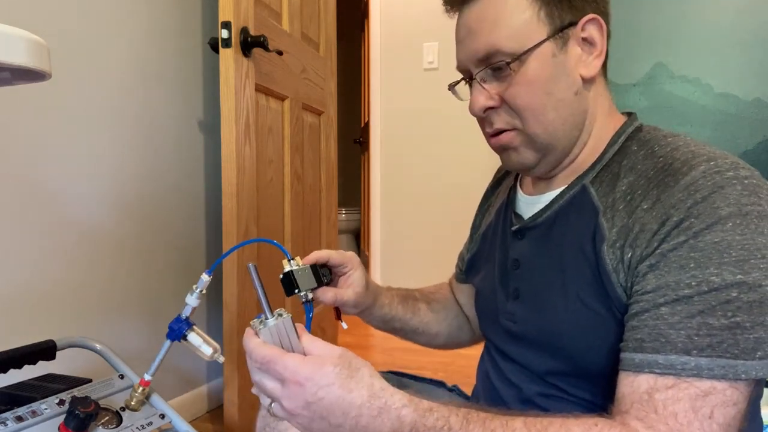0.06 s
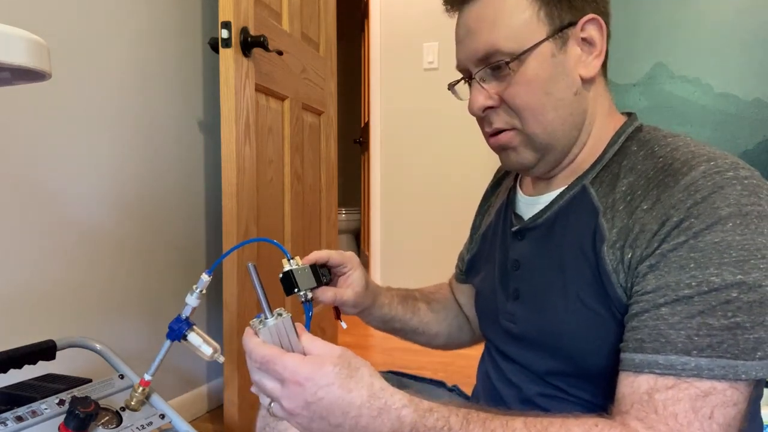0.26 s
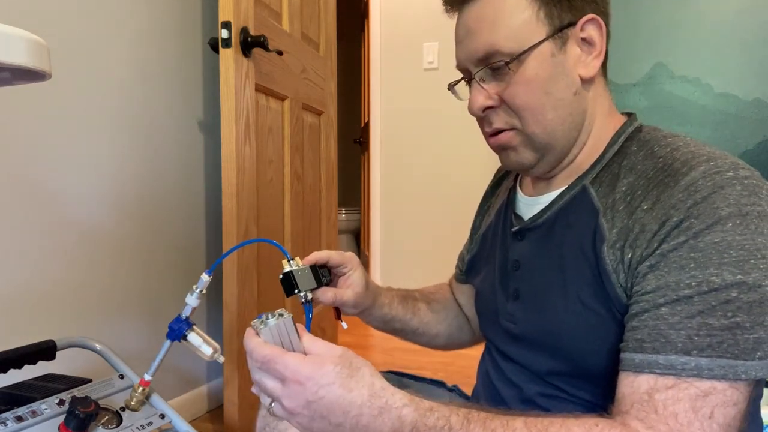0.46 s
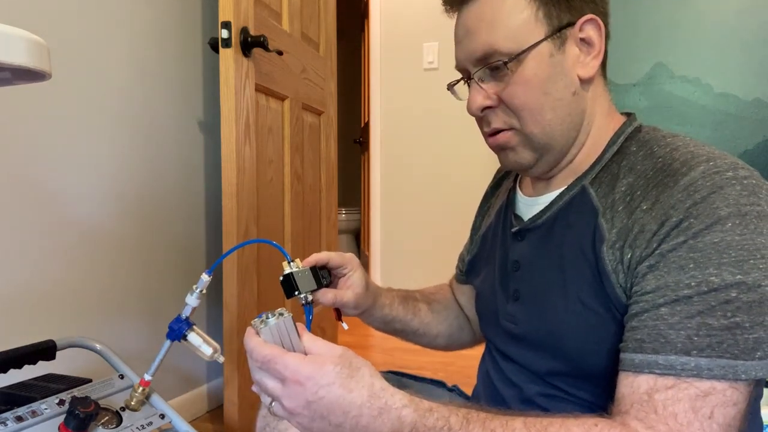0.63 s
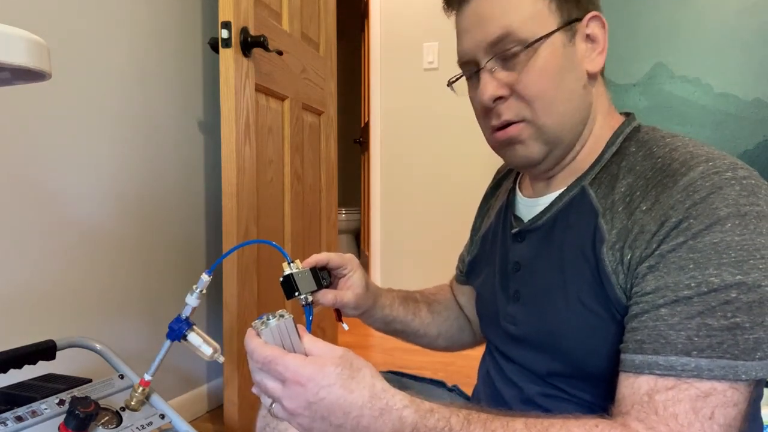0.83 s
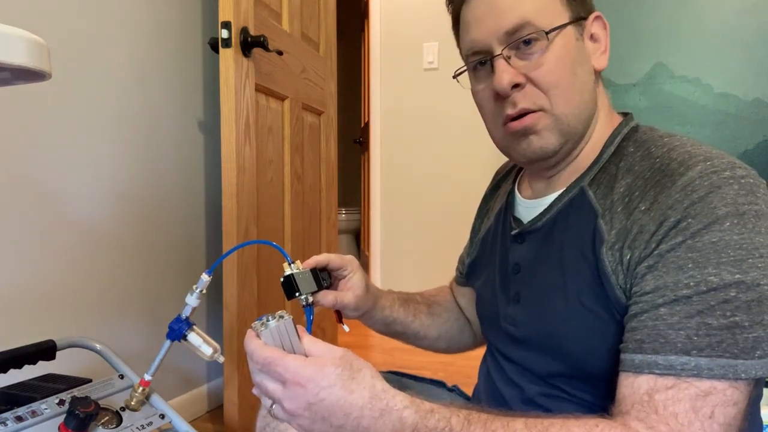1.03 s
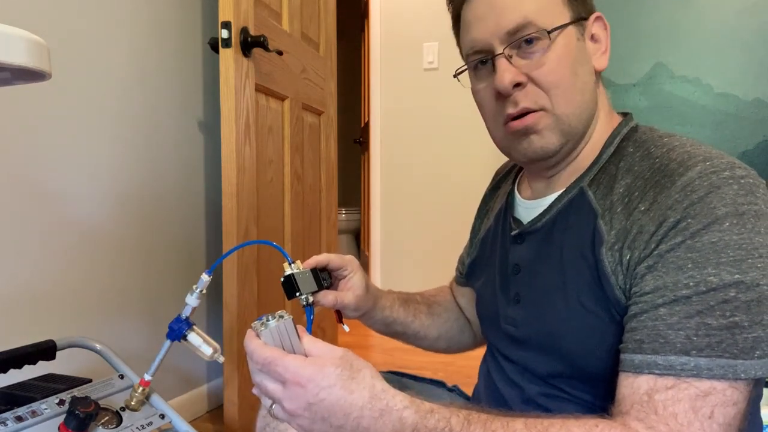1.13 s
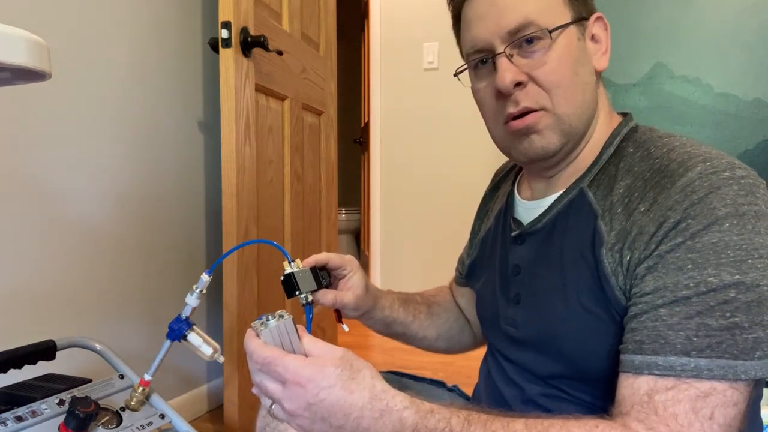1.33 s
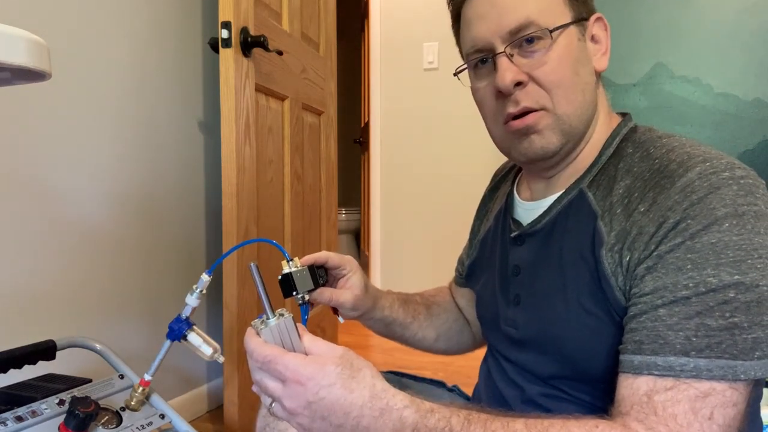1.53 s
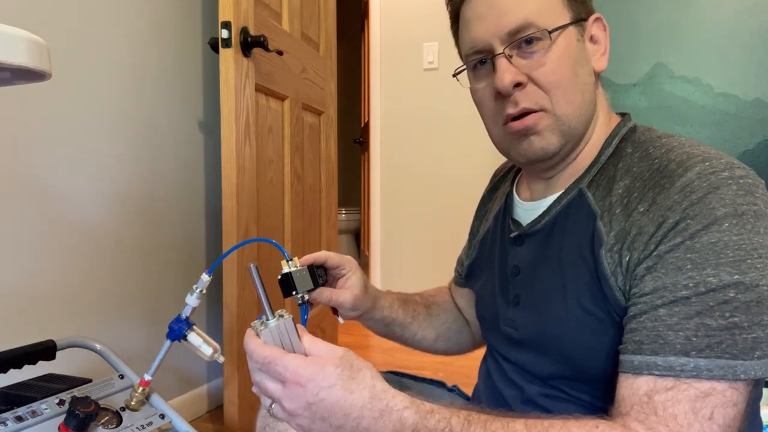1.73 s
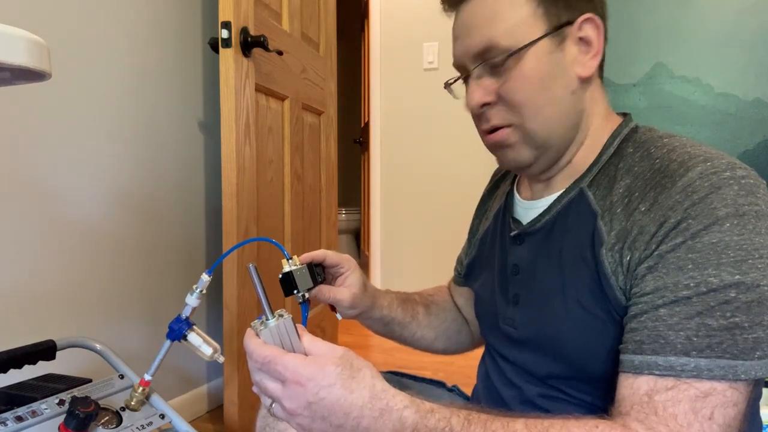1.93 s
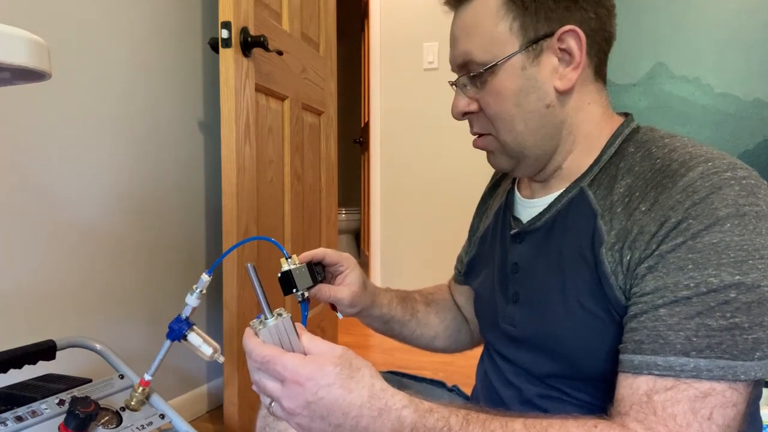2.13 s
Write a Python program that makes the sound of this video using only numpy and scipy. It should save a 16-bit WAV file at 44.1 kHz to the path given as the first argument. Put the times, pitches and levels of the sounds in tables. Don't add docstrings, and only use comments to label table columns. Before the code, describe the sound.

Two loud pneumatic bangs about a second apart, each a hiss, pop and clack in a small room

```python
import sys
import numpy as np
from scipy import signal
from scipy.fft import rfft, irfft
from scipy.io import wavfile
from scipy.ndimage import uniform_filter1d

SR = 44100
rng = np.random.default_rng(int(sys.argv[2]) if len(sys.argv) > 2 else 0)


def materialize(psi):
    bounded = np.clip(np.atleast_2d(psi).T, -1, 1)
    quanta = np.round(bounded * 32767).astype(np.int16)
    wavfile.write(sys.argv[1], SR, quanta)


def gain_from_decibels(decibels):
    exponent = np.asarray(decibels, float) / 20
    return 10 ** exponent


N = 95476

# hiss start in seconds, pop in seconds, end stop in seconds,
# pop level in dB, hiss level in dB.
STROKES = [
    (0.389, 0.3906, .4905, -4, -17.5),
    (1.436, 1.448, 1.5162, -4.5, -13),
]
# frequency in Hz, level in dB, T60 in seconds.
HOSE = [(237.66, -6.5, 0.045), (330, -13, 0.019), (476, -4.5, 0.022), (662, -2.5, 0.044),
        (875, -12.5, 0.026), (1120, -3.5, 0.018), (1347, -7.5, 0.0084), (1773, -5, 0.013),
        (2600, -6.5, 0.014), (4253, -8.5, 0.06), (8910, -11.5, .015)]


def shape(x, table):
    hz, db = np.array(table, float).T
    f = np.fft.rfftfreq(x.shape[-1], 1 / SR)
    gain_db = np.interp(np.log(f + 1), np.log(hz), db, left=db[0] - 15)
    y = irfft(rfft(x) * gain_from_decibels(gain_db), x.shape[-1])
    return y / y.std()


def band(x, hz, width):
    return signal.lfilter(*signal.iirpeak(hz, hz / width, fs=SR), x)


def low(x, hz, order=1):
    return signal.sosfiltfilt(signal.butter(order, hz, fs=SR, output="sos"), x)


def walk(rate):
    size = int(SR / rate)
    w = uniform_filter1d(rng.standard_normal(N), size, mode="wrap")
    w = uniform_filter1d(w, size, mode="wrap")
    return (w - w.mean()) / w.std()


def pair(n, alike_hz):
    mid, side = rng.standard_normal((2, n))
    side = side - low(side, alike_hz)
    return np.array([mid + side, mid - side])


def strike(at, modes, crack_db, crack_s, rise_s=0):
    # frequency in Hz, level in dB per Hz.
    crack_colour = [(400, -7.5), (1100, 1.5), (2500, -4.5), (5000, -10.5), (15000, -8.5)]
    t = np.arange(N) / SR - at
    u = np.maximum(t, 0)
    ring = 0
    for hz, db, t60 in modes:
        t60 = np.clip(t60, 0.003, 36 / hz + 0.0065)
        ring = ring + gain_from_decibels(db) * np.sin(2 * np.pi * hz * u) * np.exp(-np.log(1000) * u / t60)
    crack = gain_from_decibels(crack_db) * shape(rng.standard_normal(N), crack_colour) * np.exp(-u / crack_s)
    return (t >= 0) * (ring + crack) * np.minimum(u / (rise_s + 1e-4), 1)


def earlier():
    # frequency in Hz, level in dB per Hz.
    old_hiss = [(1500, -14), (2600, -11.5), (3700, -1), (6000, -9), (9400, -3), (13300, -2), (15500, -5)]
    t = np.arange(N) / SR
    ring_hz = 3830
    ring = band(band(pair(N, 500), ring_hz, 1500), ring_hz, 1500)
    hiss_part = shape(pair(N, 500), old_hiss) * gain_from_decibels(-36.5 - 60 * t / 0.1)
    return hiss_part + ring / ring.std() * gain_from_decibels(-51.5 - 60 * t / 0.19)


def hum():
    # frequency in Hz, level in dB per Hz.
    hum_colour = [(30, -22.5), (62, 1.5), (150, -13.5), (580, -22), (2500, -35.5), (6000, -39), (8500, -37),
                  (15500, -42.5)]
    bed = shape(pair(N, 900), hum_colour)
    bass = low(bed, 220, order=2)
    bed = bed - bass + bass * gain_from_decibels(3 * walk(12))
    mains = band(rng.standard_normal(N), 58, 12)
    duct = band(rng.standard_normal(N), 394, 70)
    return gain_from_decibels(-57) * bed + gain_from_decibels(-62) * mains / mains.std() + gain_from_decibels(-68.5) * duct / duct.std()


def onset_swell():
    # frequency in Hz, level in dB per Hz.
    swell_colour = [(300, -1), (2000, 0), (5000, -2), (8500, -8)]
    lead_s, growth_s = 0.022, 0.006
    t = np.arange(N) / SR
    noise = low(shape(pair(N, 800), swell_colour), 8500, order=8)
    swell = 0
    for start, *_ in STROKES:
        rise = np.exp((t - start).clip(max=0) / growth_s)
        swell = swell + rise * (t > start - lead_s) * (t < start)
    return gain_from_decibels(-25.5) * noise * swell


def hiss():
    # frequency in Hz, level in dB per Hz.
    jet_colour = [(200, -12), (900, -11), (2500, -11), (4700, -12.5), (6200, -8), (9000, -10.5),
                  (12000, -12.5), (15500, -9.5)]
    # frequency in Hz, width in Hz, level in dB.
    nozzle = [(592.6, 90, -7.5), (3337, 130, -19), (4460, 1200, -8), (4800, 170, -6.5), (7500, 2700, -8.5)]
    attack_s, release_s = 0.0029, 0.006
    t = np.arange(N) / SR
    white = rng.standard_normal(N)
    jet = shape(white, jet_colour)
    for hz, width, db in nozzle:
        jet = jet + gain_from_decibels(db) * 3 * band(white, hz, width)
    flow = 0
    for start, pop, stop, _, db in STROKES:
        level_db = np.interp(t, [pop - 0.012, pop - 0.001, pop, stop], [0, -11.5, 0, -6])
        gate = np.clip((t - start) / attack_s, 0, 1) * np.exp(-np.maximum(t - stop, 0) / release_s)
        flow = flow + gain_from_decibels(db + level_db) * gate
    return jet * flow * gain_from_decibels(1.2 * walk(150))


def pops():
    # frequency in Hz, level in dB, T60 in seconds.
    boom_modes = [(63.7, -10.5, 0.17), (83.3, -7, 0.15), (255, -11.5, 0.2)]
    t = np.arange(N) / SR
    total = 0
    for _, pop, _, db, _ in STROKES:
        boom = strike(pop, boom_modes, -67, 0.77, rise_s=0.021) * (t < pop + 0.5)
        total = total + gain_from_decibels(db) * (strike(pop, HOSE, -5.5, 0.0062) + boom)
    return total


def clacks():
    # time in seconds, level in dB, part, whose whole number is an index into parts.
    bounces = [(0.3941, -9.5, 4), (0.4014, -10.5, 4), (.4908, -7, 1), (0.4926, -5, 1.5), (0.4931, -10, 1),
               (0.4957, -14.5, 3.5), (.505, -13.5, 0.5), (1.4364, -13, 2.5), (1.4505, -4.5, 4),
               (1.4553, -9.5, 4), (1.5203, -3.5, 1), (1.5252, -9, 3.5)]
    # frequency in Hz, level in dB, T60 in seconds.
    cap_stop = [(735.3, -2.5, 0.034), (1367, 1.5, .016), (1970, -5, 0.013), (2710, -4.5, 0.0037),
                (3591, -0.5, .016), (4260, -5.5, .008), (8480, -2.5, 0.012)]
    rod_stop = [(729.4, -11.5, 0.0054), (1200, -9, 0.0099), (2350, -9.5, .006), (3700, -13, .004),
                (4750, 3, .005), (8434, -5.5, 0.0044)]
    armature = [(1700, 1, 0.014), (4530, -3, .015), (7600, -8.5, .01), (14000, -1.5, .02)]
    thud = [(95, -8.5, .08), (166, -9.5, .06), (253, -2, 0.053), (406, -12, 0.016)]
    parts = (cap_stop, rod_stop, armature, thud, HOSE)
    return sum(gain_from_decibels(db) * strike(at, parts[int(part)], -6, 0.0027) for at, db, part in bounces)


def puffs():
    # time in seconds, level in dB.
    puff_times = [
        (.491, -10),
        (1.522, -13),
    ]
    # frequency in Hz, level in dB per Hz.
    puff_colour = [(300, -3), (900, -0.5), (2800, 1), (6500, -3), (15000, -13.5)]
    t = np.arange(N) / SR
    flow = sum(gain_from_decibels(db) * (t > at) * np.exp(-(t - at).clip(0) / 0.011) for at, db in puff_times)
    return shape(rng.standard_normal(N), puff_colour) * flow


def room(x):
    # frequency in Hz, T60 in seconds.
    room_t60 = [(60, 0.094), (300, 0.37), (1500, 0.33), (4000, .38), (9000, 0.19), (15000, .2)]
    gap_s, fade_db, fade_s, tilt_db = 0.0048, -10, 0.26, 0.5
    t = np.arange(SR // 2) / SR
    noise = pair(len(t), 250)
    hz, t60 = np.array(room_t60).T
    echo = 0
    for f in 45 * 2 ** np.arange(0, 8.6, 0.5):
        decay = np.interp(np.log(f), np.log(hz), t60)
        gain = gain_from_decibels(tilt_db * np.log2(f / 1000) - 60 * t / decay) / np.sqrt(decay * SR / 14)
        echo = echo + band(noise, f, f / 3) * gain
    echo = echo * np.clip(t / gap_s - 1, 0, 1) * gain_from_decibels(fade_db * (t / fade_s) ** np.e)
    return gain_from_decibels(-8.5) * signal.fftconvolve(x[None], echo, axes=1)[:, :N]


def scene():
    near = hiss() + pops() + clacks()
    wall_s, wall_hz = 0.0026, 201
    wall = np.interp(np.arange(N) - wall_s * SR, np.arange(N), near)
    wall = signal.lfilter(*signal.butter(1, wall_hz, "high", fs=SR), wall)
    wall = gain_from_decibels(-9) * wall * np.array([[1], [-1]])
    heard = near + wall + room(near + puffs())
    lean = gain_from_decibels(np.array([[0.5], [-0.5]]) * 7) - 1
    bass = signal.lfilter(*signal.butter(1, 250, fs=SR), heard)
    return heard + lean * bass + earlier() + hum()


def top_cut(x):
    return signal.sosfilt(signal.butter(12, 15720, fs=SR, output="sos"), x)


def record(dry):
    port_lag_s = 1 / 4550
    below = low(dry, 7000, order=4)
    treble = (dry - below)[0]
    f = np.fft.rfftfreq(N, 1 / SR)
    late = irfft(rfft(treble) * np.exp(-2j * np.pi * f * port_lag_s), N)
    bass_cut = signal.butter(4, 43, "high", fs=SR, output="sos")
    below = signal.sosfilt(bass_cut, below + onset_swell())
    x = below + np.array([treble, late])
    x = signal.sosfilt(signal.ellip(8, 0.2, 60, 15750, fs=SR, output="sos"), x)
    knee = 6
    x = x / (1 + np.abs(x) ** knee) ** (1 / knee)
    return top_cut(x)


dry = scene()
out = record(dry)
materialize(out)
```